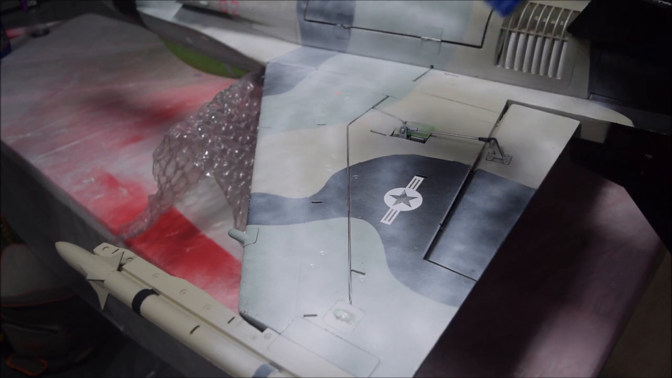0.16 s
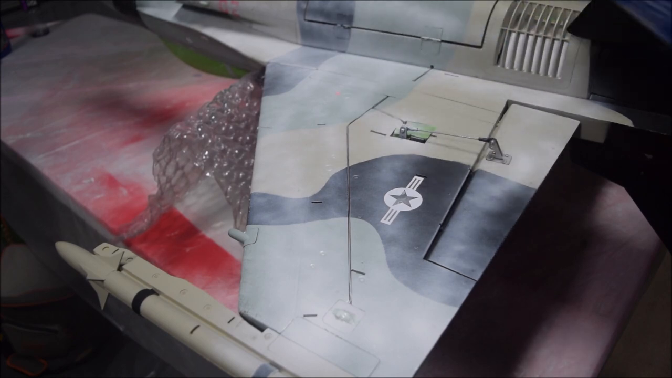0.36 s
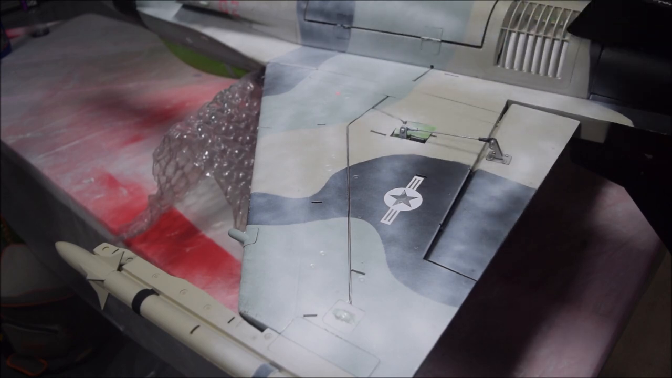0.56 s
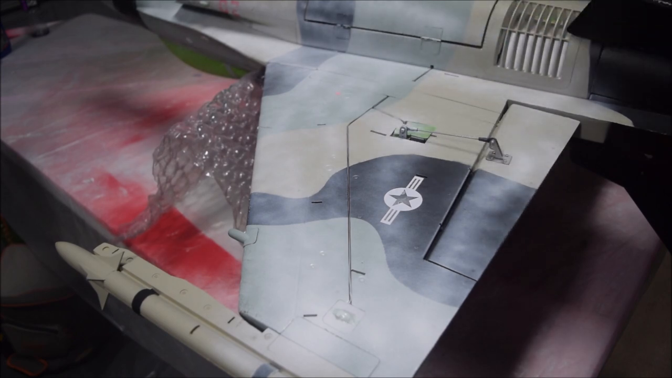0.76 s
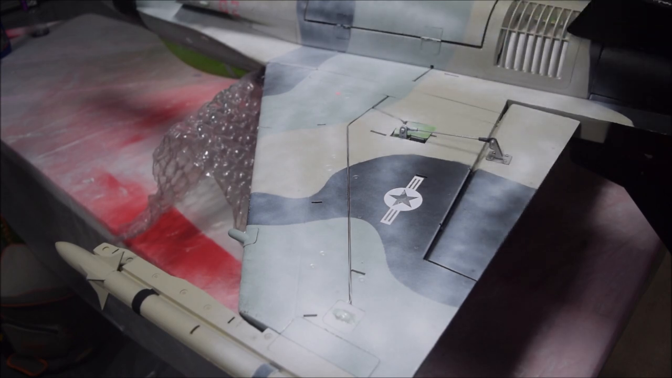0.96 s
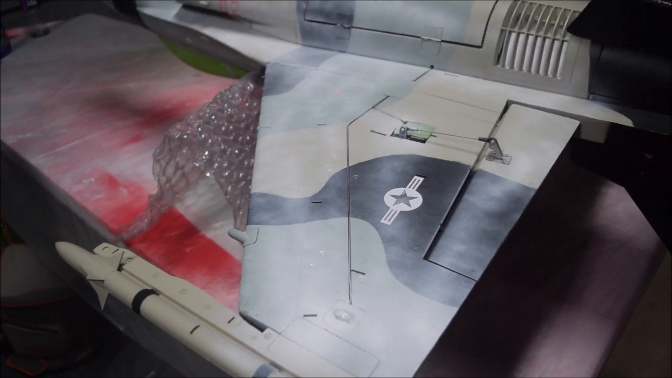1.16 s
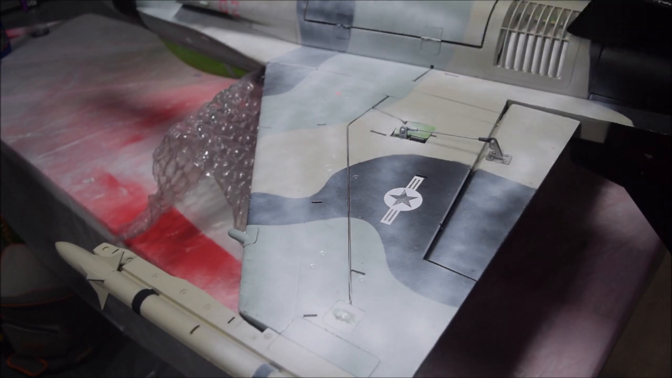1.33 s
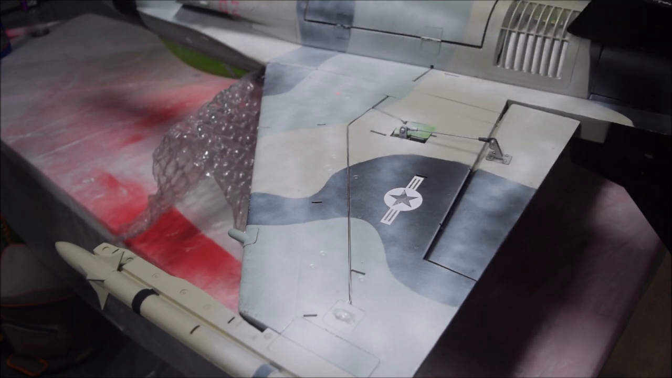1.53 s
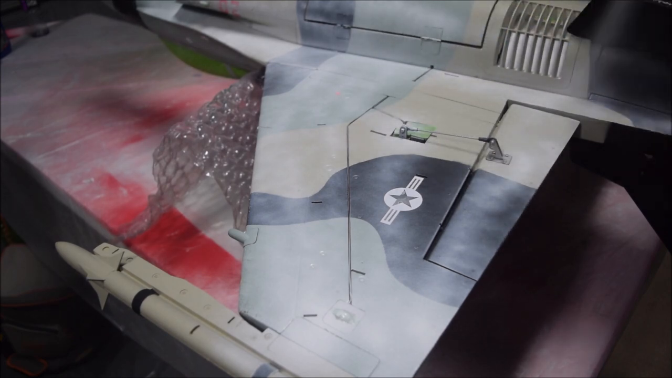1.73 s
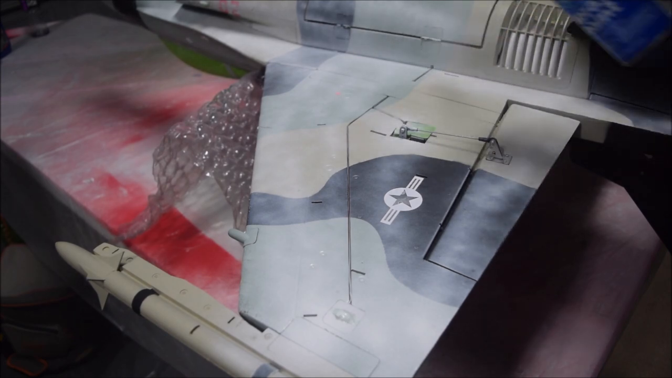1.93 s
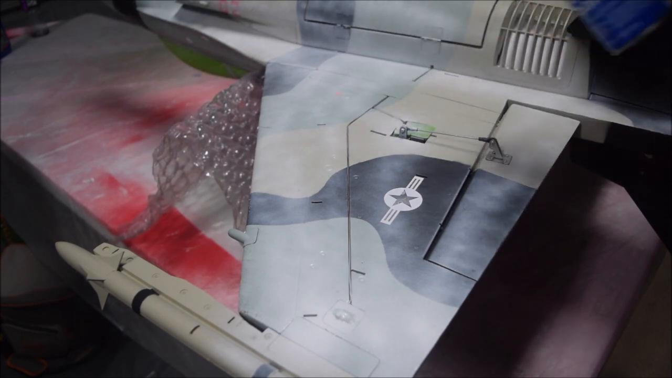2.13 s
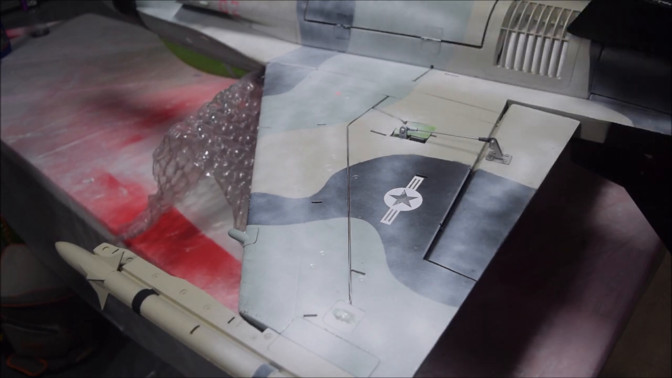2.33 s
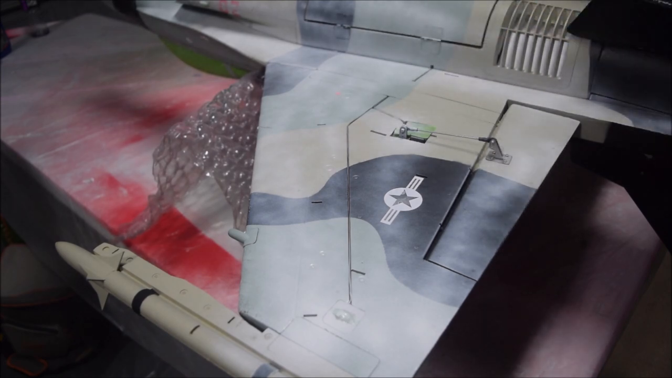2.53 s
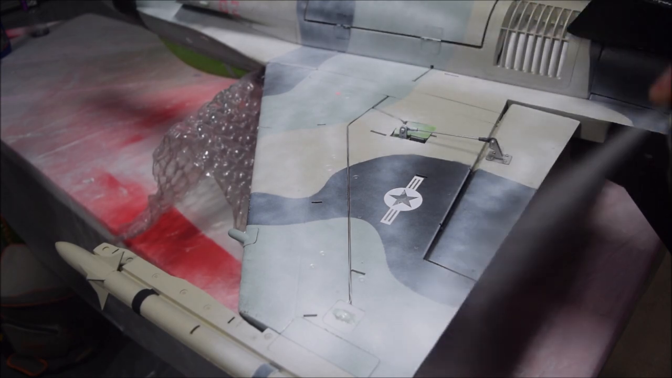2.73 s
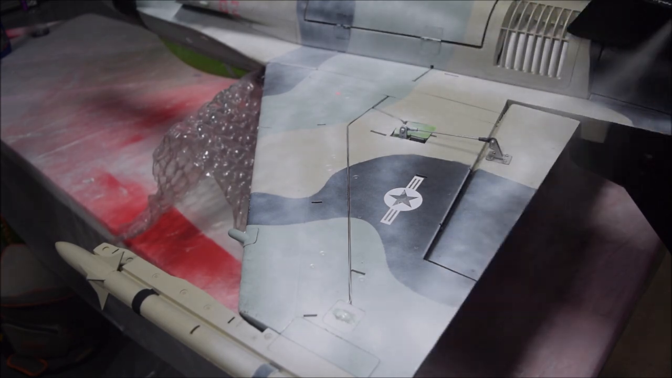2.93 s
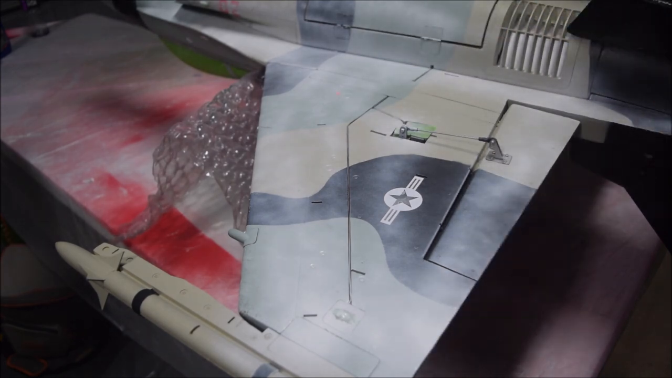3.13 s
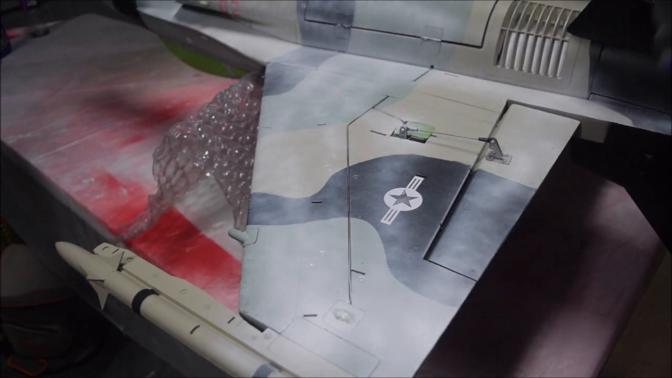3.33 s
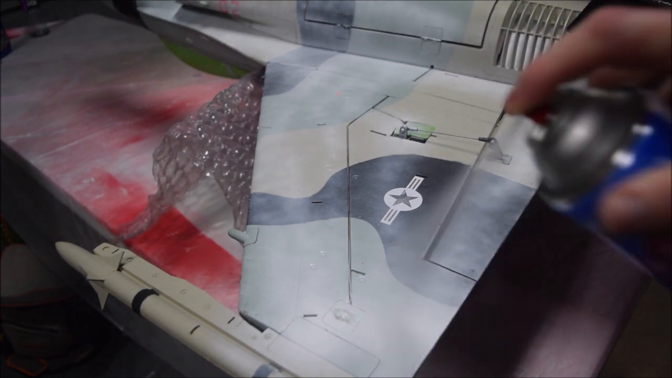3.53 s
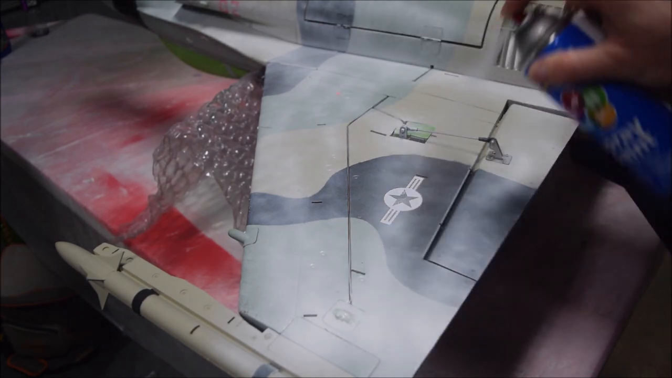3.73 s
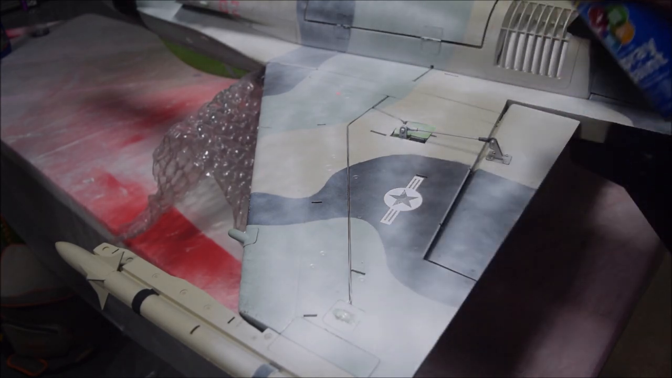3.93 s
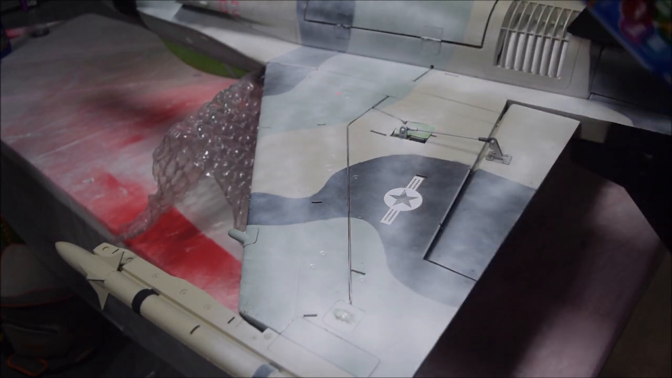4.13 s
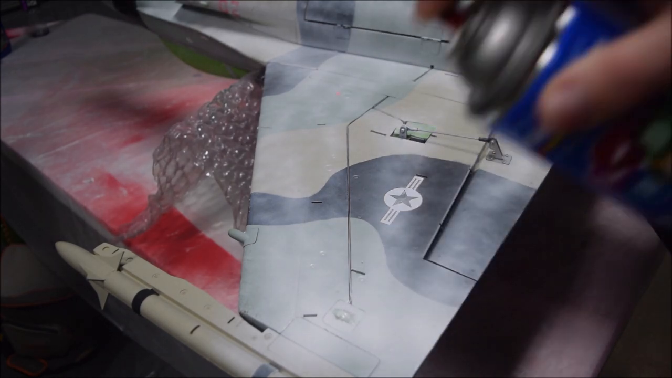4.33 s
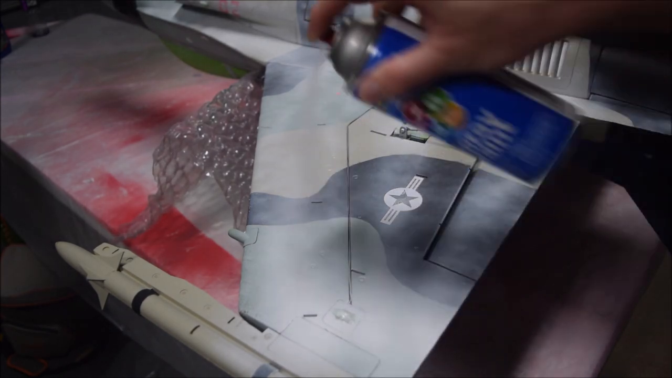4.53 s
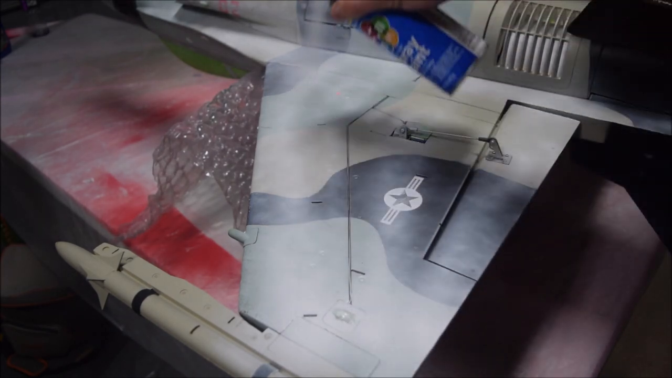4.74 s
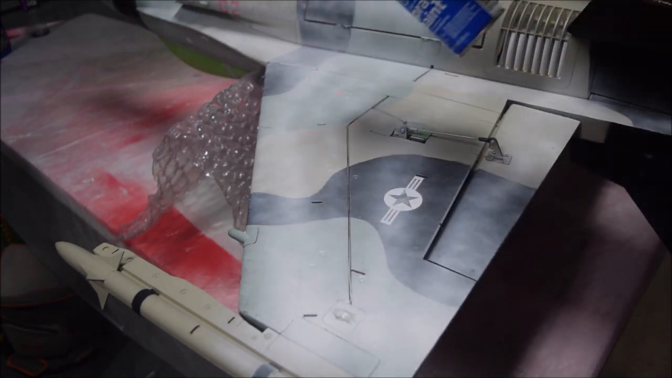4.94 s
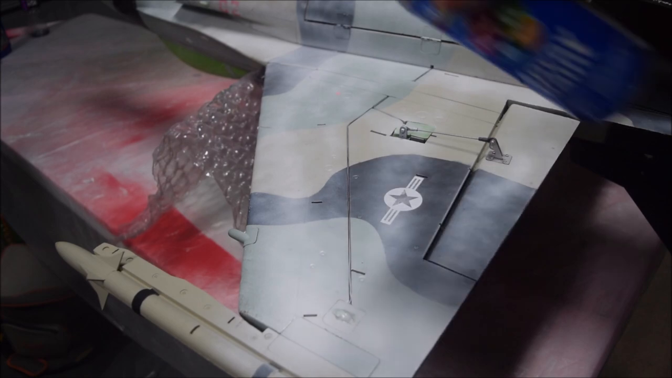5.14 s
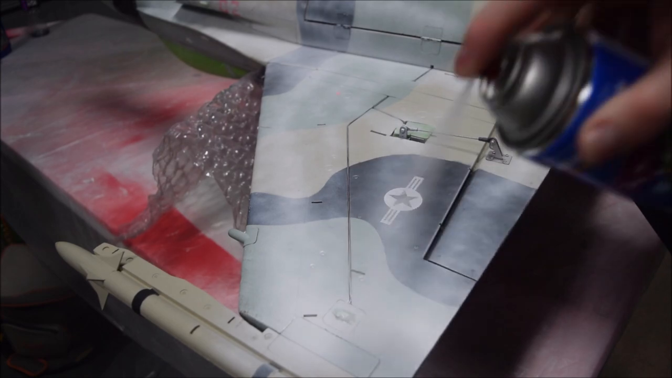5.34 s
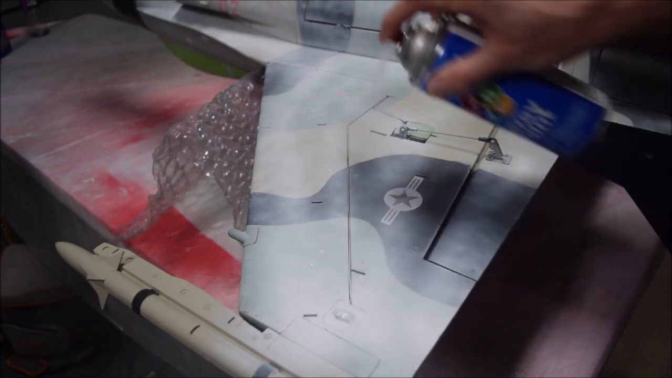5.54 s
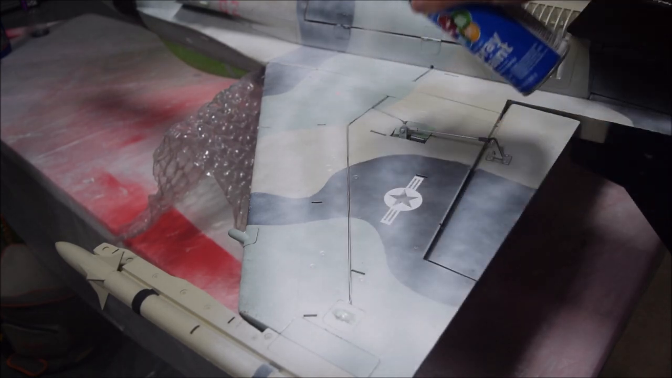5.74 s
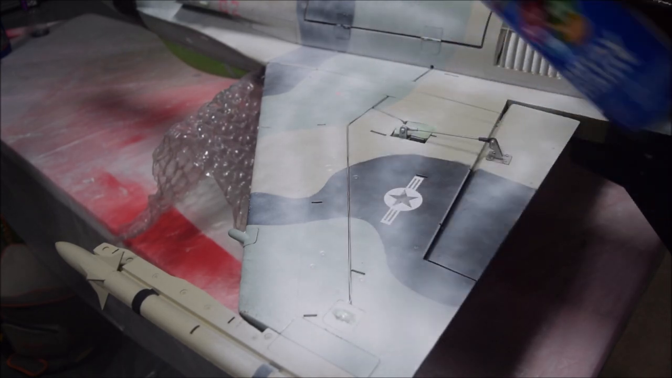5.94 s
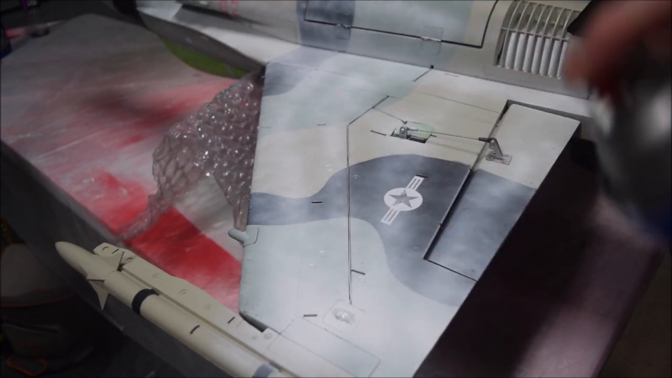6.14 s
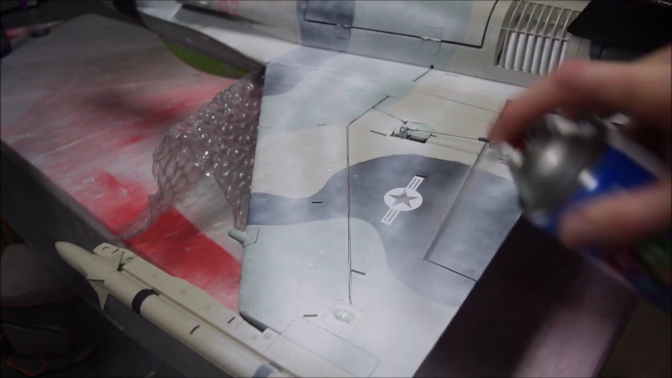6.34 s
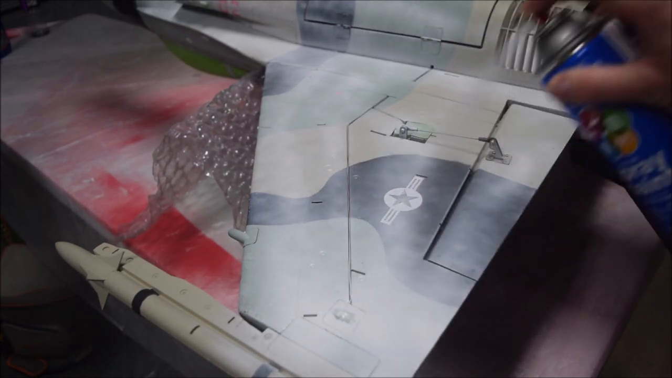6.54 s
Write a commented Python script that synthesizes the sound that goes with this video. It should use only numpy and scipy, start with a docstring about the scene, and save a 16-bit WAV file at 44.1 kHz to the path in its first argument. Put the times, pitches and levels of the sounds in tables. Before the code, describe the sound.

In a small, slightly echoing workshop, spray paint goes on in light coats. One burst ends right away, leaving a few close, dull knocks and some quiet rubbing. Six half-second hisses then come at a steady pace, with metallic ticks from the ball inside the can, the sharpest near the end. Underneath are a faint hum, a thin high whine and a soft rush that slowly fades.

```python
"""A spray can lays light coats of paint on a model aircraft, over the hum and thin whine of a small workshop.
A first burst of hiss ends at once; soft rubbing, one squeak and a few dull knocks follow.
From 1.5 s come six more bursts, each a turbulent jet whose colour sweeps as its echoes off wing and hull
interfere with it. Between and during them the mixing ball rings the can, while a soft rush dies away.
A finger clicks on the nozzle at 3.36 s, and the ball strikes loudest near 5.8 s."""
import sys
import numpy as np
from scipy import signal
from scipy.fft import rfft, irfft
from scipy.io import wavfile

SR = 44100
rng = np.random.default_rng(int(sys.argv[2]) if len(sys.argv) > 2 else 0)


def wrap_up_sound(samples):
    """Save the sound to the file named by the first command line argument, as 16-bit audio."""
    columns = np.atleast_2d(samples).T
    # keep every value between -1 and 1, then stretch to whole-number steps
    tamed = np.clip(columns, -1, 1)
    steps = np.round(tamed * 32767).astype(np.int16)
    wavfile.write(sys.argv[1], SR, steps)


N = 295029
FRAME, HOP = 512, 128  # samples
TIME = np.arange(N) / SR
BIN_HZ = np.fft.rfftfreq(FRAME, 1 / SR)
FRAME_S = np.arange(0, N + FRAME, HOP)[:, None] / SR

# spectra of the room air and of the soft rush: f/Hz, relative level/dB
AIR_SPECTRUM = [(15, -52), (25, -62), (123, -3.5), (249, 7.5), (427, -19), (591, 0.5), (714, -4), (863, 4),
                (1790, -10), (2990, -3), (3340, -4), (5000, -2.5), (6050, -8), (6920, -29), (16000, -23)]
RUSH_SPECTRUM = [(80, -26), (300, -0.5), (600, -4.5), (900, -3.5), (1300, 0), (1700, -4.5), (2100, 0.5),
                 (2700, -8), (5000, -16), (8000, -19), (12500, -20), (16000, -36)]
# partials of the hum: f/Hz, level/dB
HUM_PARTIALS = [(59, -93), (86, -84), (120, -82.5), (172, -77), (240, -68), (360, -73)]
# reverberation time of the room: f/Hz, T60/s
ROOM_DECAY = [(200, 1), (1000, 0.89), (2500, 0.68), (5000, 0.81), (8000, 0.67), (12000, 0.75),
              (16000, 0.32)]
# likeness of left and right in the room: f/Hz, coherence
ROOM_COHERENCE = [(200, 0.94), (600, 0.88), (1200, 0.98), (3000, 0.99), (5000, 0.85), (8000, 0.1),
                  (16000, 0.1)]
# dull knocks: t/s, level/dB, f/Hz, T60/s
DULL_KNOCKS = [(0.1926, -38, 580, 0.026), (0.3562, -41, 687, 0.029), (0.8521, -26.5, 1580, 0.0061),
               (1.089, -36, 1220, 0.0079), (1.2257, -33, 474, 0.016), (1.2307, -17, 1100, 0.0095)]
# spectrum of the rubbing: f/Hz, relative level/dB
RUB_SPECTRUM = [(150, -24), (400, 3.5), (700, 1), (1700, 1), (2800, -3), (5000, -9), (8000, -13),
                (12000, -21.5), (16000, -32)]
# strokes of rubbing: start/s, attack/s, stop/s, level/dB, fade/(dB/s)
RUB_STROKES = [(0.49, 0.052, 0.74, -45.5, 74), (0.846, 0.0066, 1.1, -45, 38)]
# normal modes of the can: f/Hz, relative level/dB, T60/s
CAN_MODES = [(1348, -12.5, 0.046), (1615, -4, 0.052), (1994, -1, 0.026), (2282, -0.5, 0.055),
             (2480, 3.5, 0.044), (3100, -12, 0.011), (3860, 7, 0.016), (4320, -6.5, 0.022),
             (4570, 9, 0.019), (5260, -32, 0.0099), (7900, -39, 0.012), (10600, 3, 0.005),
             (11600, -24, 0.0082)]
# taps on the can (mixing-ball rattles, and one high finger click on the nozzle at 3.36 s):
# t/s, level/dB, hardness/(dB/octave), number of taps, tap interval/s
CAN_TAPS = [(0.1988, -36.5, -19, 1, 0), (1.3986, -40.5, 1, 2, 0.0147), (2.078, -35, -41, 1, 0),
            (2.5593, -35, -2, 2, 0.0113), (3.359, -38, 17, 1, 0), (3.399, -32.5, -1, 5, 0.0097),
            (4.201, -42, -3, 2, 0.0075), (4.714, -32, -15, 4, 0.0099), (5.2334, -42, 1, 1, 0),
            (5.6564, -30, -21, 3, 0.012), (5.7893, -17.5, 3, 1, 0), (5.8101, -33.5, -29, 3, 0.013),
            (5.845, -25.5, -4, 1, 0), (6.191, -24.5, 0, 1, 0), (6.506, -25, -8, 3, 0.025)]
# spectrum of the jet: f/Hz, relative level/dB
JET_SPECTRUM = [(240, -29.5), (400, -7.5), (474, -22.5), (520, -13.5), (826, -8), (1010, -6), (1650, -2),
                (1790, -1.5), (2880, 0), (4510, -1.5), (5690, -4.5), (7060, -7.5), (11900, -13),
                (15000, -12.5), (16000, -24)]
# likeness of left and right in the jet: f/Hz, coherence
JET_COHERENCE = [(300, 0.996), (3000, 0.998), (5000, 0.96), (7000, 0.74), (10000, 0.55), (15000, 0.47)]
# reach of the jet's low roar, high fizz, top sizzle and treble balance: f/Hz, share
ROAR_SHARE = [(1100, 1.0), (2100, 0.22)]
FIZZ_SHARE = [(6500, 0), (11000, 1.0), (15000, 0.78)]
SIZZLE_SHARE = [(11500, 0), (14000, 1)]
PAN_SHARE = [(6000, 0), (12000, 1)]
# presses of the nozzle, levels relative: open/s, shut/s, body level/dB, body sag/(dB/s), fizz level/dB,
# sizzle level/dB, sizzle drift/(dB/s), treble left minus right/dB,
# hollow peak's starting f/Hz, its glide/(octave/s), its height/dB
NOZZLE_PRESSES = [(-0.3, 0.106, -40.5, -6, -36.5, -7, -3, -1, 4400, 0.74, 28),
                  (1.493, 2.076, -38, 2.5, -38, 4, -16, -3, 2980, 0.09, 1.5),
                  (2.575, 3.117, -32.5, 15.5, -39, -4.5, 13, -3.5, 4930, 0.5, 8.5),
                  (3.457, 3.938, -31.5, 18.5, -38, -4.5, -1, -0.5, 4840, 2.1, 5.5),
                  (4.353, 4.907, -33, 13.5, -37, -2.5, -12, -1, 5270, 2.3, 7),
                  (5.288, 5.783, -33, 12.5, -38, -6, 1, 0, 4930, 1.66, 6),
                  (6.172, 6.606, -33, 8.5, -39, -2, -7, 0, 4820, 2.2, 6.5)]
# one pass over the wing per press: nearest t/s, echo delay then/s, echo strength, ring level/dB
WING_PASSES = [(0, 0.00065, 0.25, 0), (2.12, 0.0011, 0.2, 4), (3.2, 0.00072, 0.13, 0),
               (3.98, 0.00062, 0.2, 0), (4.76, 0.00051, 0.28, 7), (5.68, 0.00049, 0.26, 7),
               (6.62, 0.00054, 0.18, 2)]


def gain_of(db):
    """Amplitude grows tenfold for every 20 dB."""
    return 10 ** (np.asarray(db) / 20)


def unit_rms(x):
    """Division by the rms value gives a signal unit power."""
    return x / np.sqrt(np.mean(x ** 2) + 1e-20)


def curve(points, hz=BIN_HZ):
    """Interpolation of a table along a logarithmic frequency axis."""
    f, value = np.transpose(points)
    return np.interp(np.log(hz + 1), np.log(f + 1), value)


def bell(centre_hz, octaves):
    """A spectral peak of unit height, Gaussian in log frequency."""
    return np.exp(-.5 * (np.log2((BIN_HZ + 1) / centre_hz) / octaves) ** 2)


def normalised(spectrum_db, lo_hz=0, hi_hz=SR / 2):
    """Power normalisation: unit noise given this spectrum has 0 dB within the band."""
    inside = (BIN_HZ >= lo_hz) & (BIN_HZ <= hi_hz)
    return spectrum_db - 10 * np.log10(np.mean(gain_of(spectrum_db) ** 2 * inside))


def band(x, lo_hz, hi_hz):
    """A Butterworth band-pass, falling 12 dB per octave on either side."""
    return signal.sosfilt(signal.butter(2, [lo_hz, hi_hz], "bandpass", fs=SR, output="sos"), x)


def add(track, start_s, sound):
    """Superposition: a sound adds to the track from its starting time."""
    part = track[max(round(start_s * SR), 0):][:len(sound)]
    part += sound[:len(part)]


def coloured(noises, spectrum_db, coherence=ROOM_COHERENCE):
    """Partial coherence: two independent noises mix as middle and side, then take on a spectrum."""
    framing = dict(nperseg=FRAME, noverlap=FRAME - HOP)
    first, second = signal.stft(noises, **framing)[2].transpose(0, 2, 1)
    likeness = np.clip(curve(coherence), -1, .999)
    middle, side = first * np.sqrt((1 + likeness) / 2), second * np.sqrt((1 - likeness) / 2)
    gain = gain_of(spectrum_db + np.zeros_like(FRAME_S))[..., :len(first), :]
    stereo = np.array([middle + side, middle - side]) * gain
    return signal.istft(stereo.transpose(0, 2, 1), **framing)[1][:, :noises.shape[1]]


def wander(rate_hz):
    """Low-passed noise gives a random fluctuation of unit rms."""
    f = np.fft.rfftfreq(N, 1 / SR)
    return unit_rms(irfft(rfft(rng.standard_normal(N)) * np.exp(-(f / rate_hz) ** 2), N))


def grainy(flutter_db, flutter_hz):
    """Random amplitude modulation roughens two channels of noise."""
    return unit_rms(rng.standard_normal((2, N)) * gain_of(flutter_db * wander(flutter_hz)))


def room_air(level_db=-60.5):
    """Stationary broadband noise forms the floor of the room's sound."""
    return gain_of(level_db) * coloured(rng.standard_normal((2, N)), normalised(curve(AIR_SPECTRUM)))


def rush(level_db=-53, hold_s=2.46, fade_db_per_s=3.5):
    """A soft, fluttering noise holds its level, then decays exponentially."""
    noise = coloured(grainy(flutter_db=2.0, flutter_hz=29.3), normalised(curve(RUSH_SPECTRUM)))
    return noise * gain_of(level_db - fade_db_per_s * np.maximum(TIME - hold_s, 0))


def whine(hz=6130, level_db=-59):
    """Noise confined to a narrow band is heard as a thin pitch."""
    spectrum_db = normalised(20 * np.log10(bell(hz, octaves=0.054) + 1e-6))
    return gain_of(level_db) * coloured(rng.standard_normal((2, N)), spectrum_db)


def mains_hum(waver_rad=0.41):
    """Random phase modulation makes each partial of the hum waver."""
    return sum(gain_of(db) * np.sqrt(2) * np.sin(2 * np.pi * hz * TIME + waver_rad * wander(rate_hz=13.6))
               for hz, db in HUM_PARTIALS)


def reverberation(sound, gap_s=0.0064, drift_hz=1.3, tails=3):
    """A diffuse field decays at its own rate in each band; the moving source drifts from tail to tail."""
    out = np.zeros((2, N))
    decay_db = -60 * FRAME_S / curve(ROOM_DECAY)
    for k in range(tails):
        tail = coloured(rng.standard_normal((2, SR)), decay_db) * (TIME[:SR] > gap_s)
        share = np.sqrt(2 / tails) * np.cos(np.pi * (2 * drift_hz * TIME + k / tails))
        out += signal.fftconvolve((sound.mean(0) * share)[None], unit_rms(tail) / np.sqrt(SR), axes=1)[:, :N]
    return out


def knocks(thud_hz=160, thud_db=-22, thud_s=0.0025, tick_db=-8, tick_s=0.00078):
    """Each impact excites one heavily damped mode, with a low thud and a short tick."""
    t, out = np.arange(SR // 8) / SR, np.zeros(N)
    for start_s, level_db, hz, t60 in DULL_KNOCKS:
        ring = np.sin(2 * np.pi * hz * t) * gain_of(-60 * t / t60)
        thud = -gain_of(thud_db) * np.sin(2 * np.pi * thud_hz * t) * np.exp(-t / thud_s)
        noise = unit_rms(band(rng.standard_normal(len(t)), lo_hz=1280, hi_hz=2760))
        tick = gain_of(tick_db) * noise * np.exp(-t / tick_s)
        add(out, start_s, gain_of(level_db) * (ring + thud + tick))
    return band(out, lo_hz=90, hi_hz=6900)


def rubbing(release_s=0.0085):
    """Sliding friction makes grainy noise, in strokes that swell, fade and stop."""
    envelope = np.zeros(N)
    for start_s, attack_s, stop_s, level_db, fade in RUB_STROKES:
        gate = np.clip((TIME - start_s) / attack_s, 0, 1) * np.clip((stop_s - TIME) / release_s, 0, 1)
        envelope += gate * gain_of(level_db - fade * np.maximum(TIME - start_s - attack_s, 0))
    return envelope * coloured(grainy(flutter_db=2.5, flutter_hz=300), normalised(curve(RUB_SPECTRUM)))


def squeak(at_s=0.564, width_s=0.0065, level_db=-39, centre_hz=722, glide_hz=68.5, jitter=0.039):
    """Friction catches once in the first stroke and gives a short rising tone."""
    progress = (TIME - at_s) / width_s
    hz = (centre_hz + glide_hz * np.tanh(progress / 2)) * (1 + jitter * wander(rate_hz=180))
    envelope = gain_of(level_db) * np.exp(1 - np.hypot(1, progress))
    return envelope * np.sin(2 * np.pi * np.cumsum(hz) / SR)


def tap(hardness, scatter_db=3.5, detune=0.012, crack_db=-5, crack_s=0.0016, crack_spread=1.57):
    """An impact rings the can's normal modes, detuned by sloshing paint; a hard one favours high modes."""
    hz, db, t60 = np.transpose(CAN_MODES)[:, :, None]
    t = np.arange(SR // 4) / SR
    scatter, shift, polarity = rng.standard_normal((3, len(CAN_MODES), 1))
    weight = gain_of(db + hardness * np.log2(hz / hz.mean()) + scatter_db * scatter) * np.sign(polarity)
    weight /= np.linalg.norm(weight)
    modes = weight * gain_of(-60 * t / t60) * np.sin(2 * np.pi * hz * (1 + detune * shift) * t)
    centroid_hz = np.sum(weight ** 2 * hz)
    noise = band(rng.standard_normal(len(t)), centroid_hz / crack_spread, centroid_hz * crack_spread)
    crack = gain_of(crack_db) * unit_rms(noise) * np.exp(-t / crack_s)
    return modes.sum(0) + crack


def can_taps(bounce_db=-0.5, unevenness=0.2):
    """Inelastic impacts: the ball bounces unevenly, weaker each time; a finger clicks the nozzle once."""
    out = np.zeros(N)
    for at_s, level_db, hardness, taps, interval_s in CAN_TAPS:
        for k in range(round(taps)):
            add(out, at_s, gain_of(level_db + k * bounce_db) * tap(hardness))
            at_s += interval_s * (1 + unevenness * rng.uniform(-1, 1))
    return band(out, lo_hz=750, hi_hz=16300)


def paint_spits(per_s=24, peak=7.6):
    """Drops of paint burst at the nozzle as a Poisson train of impulses."""
    return peak * rng.uniform(-1, 1, N) * (rng.random(N) < per_s / SR)


def hollow_peak(age, start_hz, glide, lasts_s=0.24, series_share=0.49):
    """A peak on the third harmonic of an odd series climbs and fades as the can swings away."""
    centre_hz = start_hz * 2 ** (glide * age)
    odd_series = -np.cos(3 * np.pi * BIN_HZ / centre_hz) * (BIN_HZ > centre_hz / 2)
    peak = (1 - series_share) * bell(centre_hz, octaves=0.19) + series_share * odd_series
    return np.exp(-(age / lasts_s) ** 2) * peak


def echo_comb_db(from_nearest_s, least_delay_s, strength, swing_s_per_s=0.0022,
                 hull_share=0.7, hull_lag_s=0.000456):
    """Interference with echoes off wing and hull makes combs that rise and deepen as the can nears."""
    delay_s = np.hypot(least_delay_s, swing_s_per_s * from_nearest_s)
    wing = strength * np.sqrt(least_delay_s / delay_s) * np.exp(-2j * np.pi * BIN_HZ * delay_s)
    hull = hull_share * wing * np.exp(-2j * np.pi * BIN_HZ * hull_lag_s)
    return 20 * np.log10(abs(1 + wing + hull))


def gap_ring(from_nearest_s, hz=1700, lasts_s=0.062):
    """Resonance: a brief ring near 1.7 kHz swells in the hiss."""
    return np.exp(-(from_nearest_s / lasts_s) ** 2) * bell(hz, octaves=0.07)


def jet_db(age, body_db, fizz_db, sizzle_db, roar_db=-13.5, roar_rise_db_per_s=6,
           puff_db=12.5, puff_s=0.034, bore_hz=12200, bore_db=3.3):
    """Turbulence radiates broadband noise: a low roar, the body of the hiss, a fizz and a top sizzle."""
    spectrum = normalised(curve(JET_SPECTRUM), 1800, 4000)  # 0 dB in the body of the hiss
    base_fizz_db = (spectrum - normalised(spectrum, 10000, 15800))[0]
    base_roar_db = (spectrum - normalised(spectrum, 500, 1500))[0]
    puff = puff_db * np.exp(-age / puff_s)  # the gas held in the valve escapes first
    roar = (roar_db + roar_rise_db_per_s * age + puff - base_roar_db) * curve(ROAR_SHARE)
    fizz = (fizz_db - body_db - base_fizz_db) * curve(FIZZ_SHARE)  # holds while the body sags
    sizzle = sizzle_db * curve(SIZZLE_SHARE)
    bore = bore_db * bell(bore_hz, octaves=0.068)  # the nozzle's bore resonates faintly
    return spectrum + body_db + roar + fizz + sizzle + bore


def spray(opening_s=0.026, closing_s=0.055, margin_s=0.1, trim_db=-0.31):
    """Source and filter: the valve gates a turbulent jet, coloured by its moving place over the wing."""
    spectrum_db, valve = np.zeros((2, len(FRAME_S), len(BIN_HZ))), np.zeros(N)
    for press, (nearest_s, least_delay_s, echo, ring_db) in zip(NOZZLE_PRESSES, WING_PASSES):
        open_s, shut_s, body_db, sag, fizz_db, sizzle_db, drift, pan_db, peak_hz, glide, peak_db = press
        active = (FRAME_S[:, 0] > open_s - margin_s) & (FRAME_S[:, 0] < shut_s + margin_s)
        t = FRAME_S[active]
        age = np.maximum(t - open_s, 0)
        db = jet_db(age, body_db - sag * age, fizz_db, sizzle_db + drift * age)
        db += peak_db * hollow_peak(age, peak_hz, glide)
        db += echo_comb_db(t - nearest_s, least_delay_s, echo)
        db += ring_db * gap_ring(t - nearest_s)
        side_db = pan_db * curve(PAN_SHARE) / 2
        spectrum_db[:, active] = db + side_db, db - side_db
        valve += np.clip((TIME - open_s) / opening_s, 0, 1) * np.clip((shut_s - TIME) / closing_s + .5, 0, 1)
    sputter = grainy(flutter_db=0.62, flutter_hz=450) + paint_spits()
    sputter *= gain_of(0.19 * wander(rate_hz=34))
    return gain_of(trim_db) * valve * coloured(sputter, spectrum_db, JET_COHERENCE)


def scene():
    """Direct sound, reverberation and background superpose; the knocks are closest and so driest."""
    hiss, handling, thumps = spray(), can_taps() + rubbing() + squeak(), knocks()
    reverberant = reverberation(gain_of(-8.5) * hiss + gain_of(-5.5) * handling + gain_of(-11) * thumps)
    background = room_air() + rush() + whine() + mains_hum()
    return background + reverberant + thumps + handling + hiss


def record(dry, low_cut_hz=42, edge_hz=15900):
    """Band limiting: the microphone's low cut, then a steep low-pass at the top of the treble."""
    thinned = signal.sosfilt(signal.butter(2, low_cut_hz, "highpass", fs=SR, output="sos"), dry)
    low_pass = signal.firwin(511, edge_hz, window=("kaiser", 9), fs=SR)
    return signal.oaconvolve(thinned, low_pass[None], "same")


dry = scene()
out = record(dry)
wrap_up_sound(out)
```